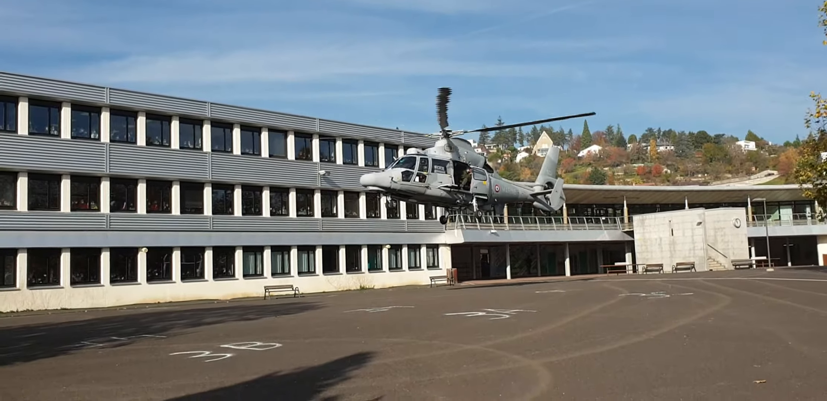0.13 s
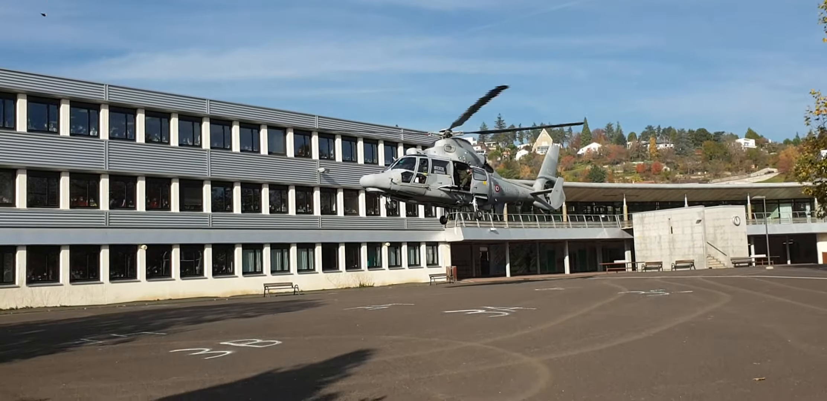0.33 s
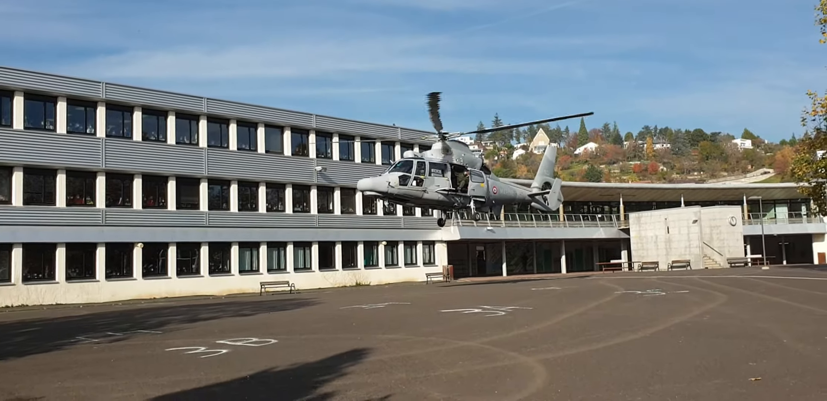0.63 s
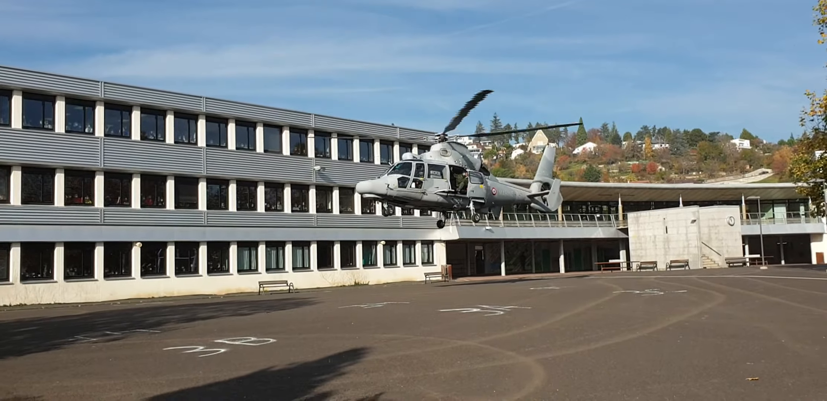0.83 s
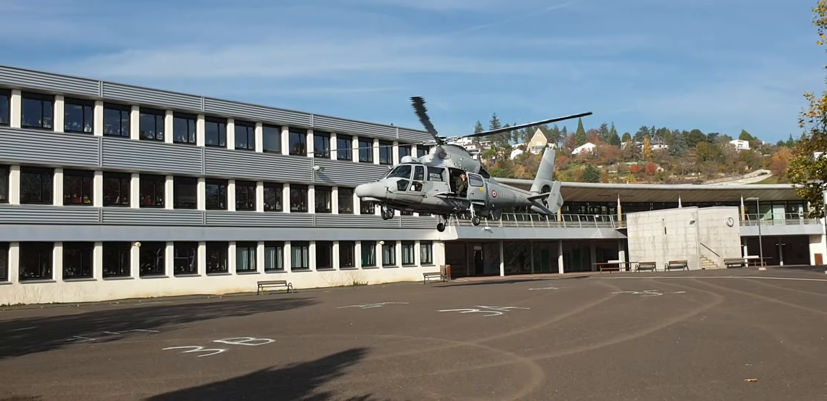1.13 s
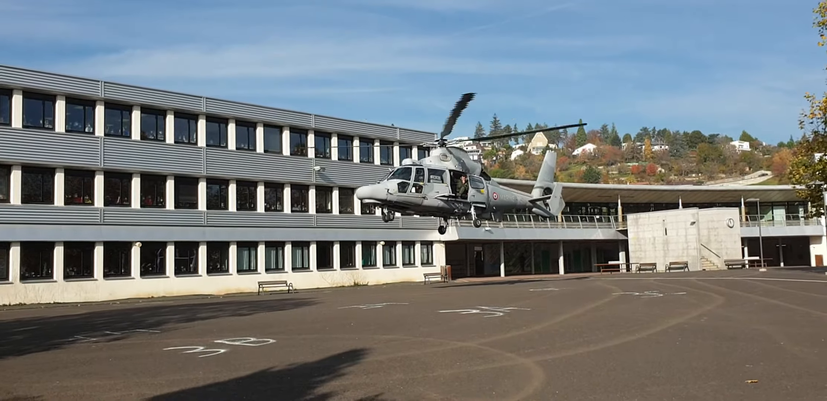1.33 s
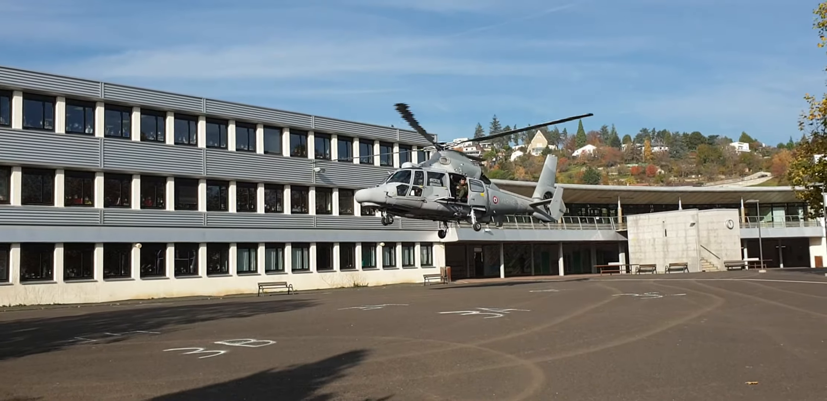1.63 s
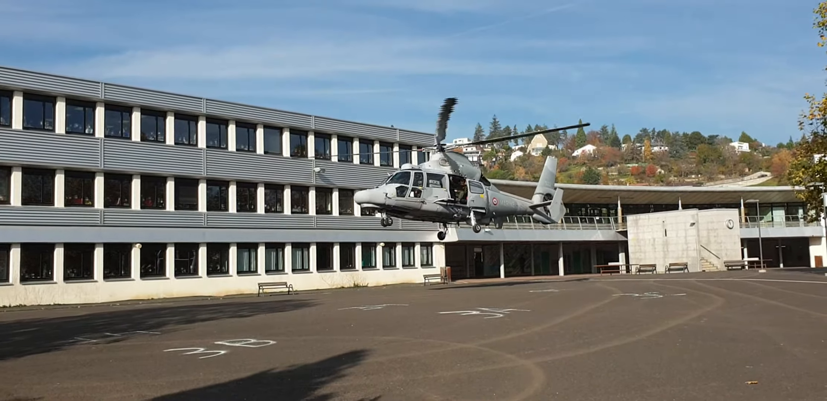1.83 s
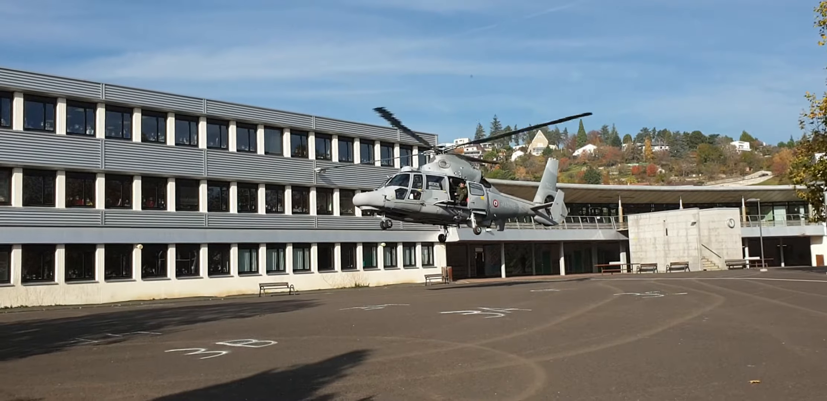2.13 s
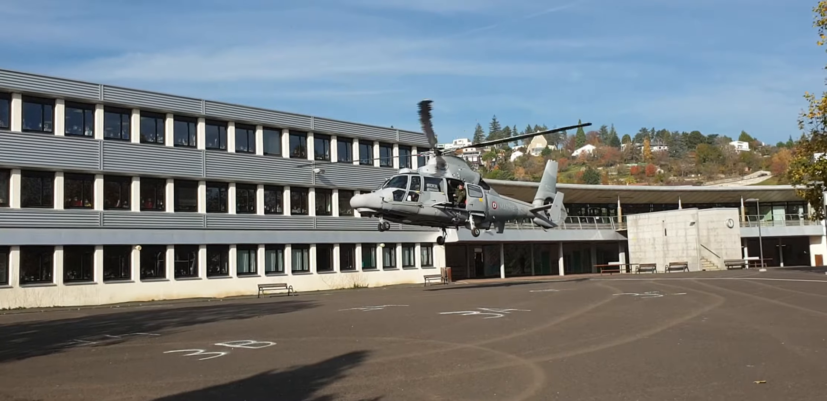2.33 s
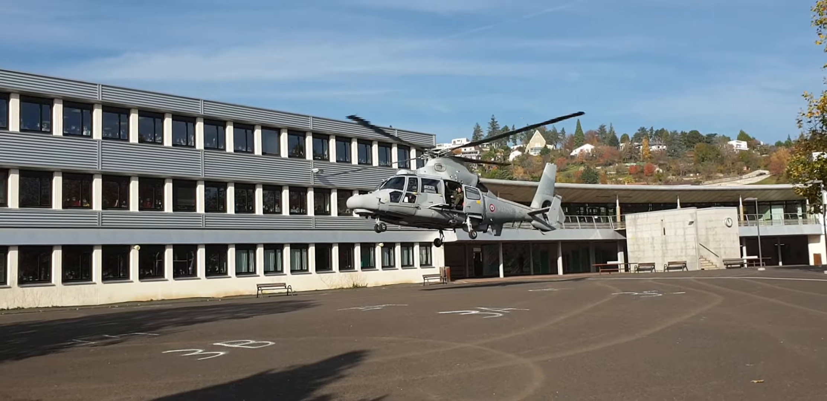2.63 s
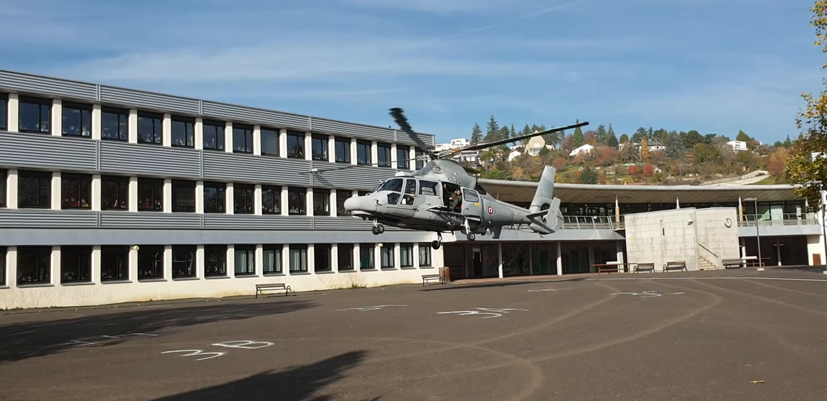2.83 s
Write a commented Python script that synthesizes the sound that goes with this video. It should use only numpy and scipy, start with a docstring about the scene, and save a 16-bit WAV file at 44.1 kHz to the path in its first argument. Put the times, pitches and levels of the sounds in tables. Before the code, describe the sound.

A helicopter hovers low, blades chopping over a roar as downwash buffets the microphone.

```python
"""A helicopter hovers low over a paved yard. From the start its four blades swish, thump and slap
over a broad turbulent roar, with a thin turbine whistle on top. About a second in, a strong gust
of downwash hits the two-port microphone, rumbling and crackling. By two seconds the gust has died
away; one band of the roar sings out briefly, and the blades chop on to the end."""
import sys
import numpy as np
from scipy import signal
from scipy.fft import rfft, irfft
from scipy.io import wavfile
from scipy.ndimage import uniform_filter1d

SR = 44100
rng = np.random.default_rng(int(sys.argv[2]) if len(sys.argv) > 2 else 0)


def dump(signal):
    """Clip the signal to [-1, 1] and save it as 16-bit WAV at the path in sys.argv[1]."""
    limited = np.clip(np.atleast_2d(signal).T, -1, 1)
    pcm = np.round(limited * 32767).astype(np.int16)
    wavfile.write(sys.argv[1], SR, pcm)


N = 130977
T = np.arange(N) / SR
BLADES_PER_S, FIRST_BLADE_S = 24.2, .034
PAN_LEFT = np.array([[.5], [-.5]])  # splits a dB difference between left and right

# The rotor's ride. Each row: time in seconds, roar, swish and knock levels in dB, blade lag in ms.
ROTOR_RIDE = [(0, -25, -25.5, -41.5, -2.5), (.3, -25, -34, -36, -2), (.6, -26, -30, -35.5, -2.5),
              (.9, -25.5, -29.5, -34.5, -1), (1.2, -24, -29.5, -36, 3), (1.5, -25, -25.5, -51, 2),
              (1.655, -30.5, -29, -35.5, 0), (1.672, -30.5, -21, -42, 2.2), (1.69, -25, -34, -33.5, 3),
              (1.8, -26, -25.5, -46, 1.2), (1.95, -26.5, -30, -40, -1.5), (2.08, -24, -25, -36.5, 0),
              (2.2, -27.5, -25.5, -40, 3.5), (2.4, -26.5, -27, -38, 3), (2.6, -26, -29.5, -45, 1.5),
              (2.8, -27.5, -28, -41.5, -0.04), (2.97, -24.5, -23.5, -38.5, -2)]
# The bands of the swish. Each row: centre in Hz, width in Hz, relative level in dB.
SWISH_BANDS = [(583, 115, -12), (1159, 140, -1), (1631, 167, -0.5), (2113, 106, -5), (3067, 150, -6.5),
               (3600, 200, -8), (4660, 1000, -9.5), (6700, 3100, -29.5)]
# Three throb resonances, then two for the knock. Each row: pitch in Hz, width in Hz, relative dB.
THUMP_MODES = [(60.7, 22, -3.5), (112, 85, -3), (218.6, 44, 0.5), (503, 48, -2), (571, 173, 6.5)]
# The hardest blade slaps. Each row: start in seconds, level in dB, ring pitch in Hz.
SLAP_HITS = [(0.0715, -15.5, 1650), (.186, -13, 1740), (0.2486, -9, 1160), (.3112, -18, 1700),
             (0.3529, -13, 1690), (0.392, -14, 1630), (.4055, -15.5, 1390), (.4339, -13, 1560),
             (0.556, -17, 1680), (0.5632, -10.5, 1630), (0.8076, -15, 1720), (0.848, -15, 1650),
             (1.6357, -12.5, 1700), (1.802, -15, 1410), (1.8874, -16, 1180), (2.0054, -15, 1220),
             (2.2643, -19, 1740), (2.3044, -16, 1200), (2.3456, -13.5, 1170), (2.3864, -18, 1770),
             (2.4645, -16, 1670), (2.5092, -19.5, 1140), (2.5518, -16, 1560), (2.881, -10, 1240)]
# Blows of air. Each row: centre in seconds, level in dB, pitch in Hz, right port's lag in cycles.
BUFFET_HITS = [(.255, -18.5, 99, 0.15), (1.082, -16, 77.4, -0.31), (1.1, -11.5, 81, -.03),
               (1.137, -21, 82, 0.32), (1.182, -21.5, 107, 0.47), (1.202, -13, 112, -0.23),
               (1.226, -18, 107, -0.043), (1.245, -13.5, 73, 0.05), (1.285, -19, 150, -0.14),
               (1.304, -15, 118, -0.2), (1.328, -13, 81, 0.33), (1.357, -18, 118, 0.28),
               (1.395, -11.5, 88, 0.42), (1.433, -17.5, 92, -.04), (1.504, -18, 80, 0.16),
               (1.538, -18.5, 68, 0.085), (1.562, -19, 66, -0.11), (1.622, -20, 115, 0.29),
               (1.732, -20.5, 90, 0.57), (1.759, -18.5, 112, -0.21)]
# Bright snaps. Each row: start in seconds, peak in dB before panning.
SNAP_HITS = [(1.048, -16), (1.1178, -9), (1.1416, -12), (1.1475, -9), (1.164, -13), (1.1855, -9),
             (1.1965, -13), (1.2054, -8.5), (1.3205, -6), (1.349, -11), (1.3883, -15), (1.3952, -17),
             (1.442, -7.5), (1.5953, -13.5), (1.6138, -8), (2.9219, -11)]
# The whistle's drift. Each row: time in seconds, pitch in Hz.
WHISTLE_PITCH = [(0, 10740), (.85, 10780), (1.5, 10740), (2.1, 10660), (2.7, 10580), (2.97, 10590)]

# Fader rides for these layers. Each row: time in seconds, level in dB.
THROB_RIDE = [(0, -42), (2.1, -46.5), (2.5, -44.5), (2.97, -37)]
RING_RIDE = [(0, -36.5), (1.95, -40), (2.07, -22.5), (2.14, -27.5), (2.2, -40), (2.97, -41)]
WIND_RIDE = [(0.0, -36), (0.95, -36.5), (1.37, -25), (1.8, -36), (1.96, -46)]
CRACKLE_RIDE = [(0, -35), (.9, -30), (1.04, -26), (1.09, -22), (1.145, -14.5), (1.17, -17.5), (1.2, -18.5),
                (1.24, -38), (1.29, -25), (1.325, -16.5), (1.337, -23), (1.348, -13.5), (1.37, -31),
                (1.395, -12), (1.415, -23.5), (1.45, -15.5), (1.475, -25), (1.58, -28.5), (1.61, -20.5),
                (1.655, -22), (1.672, -49), (1.72, -26.5), (2.97, -49)]
WHISTLE_RIDE = [(0, -35), (0.2, -37.5), (0.34, -28), (0.39, -37.5), (.81, -31.5), (1.0, -38), (1.12, -30.5),
                (1.49, -41.5), (1.85, -43), (1.9, -32), (1.94, -41), (2.04, -45), (2.075, -27), (2.11, -41),
                (2.52, -42), (2.65, -33), (2.75, -37.5), (2.97, -37.5)]

# EQ curves for the noisy layers. Each row: frequency in Hz, relative level in dB.
SLAP_EQ = [(500, -9), (1150, 3.5), (1600, -6), (2200, 2), (3600, -9), (6000, -20), (16000, -60)]
ROAR_EQ = [(18, -40), (30, -11), (59, -14.5), (147, -9.5), (206, -11), (334, -17.5), (415, -17.5),
           (527, -8), (814, -11.5), (1140, -4), (1380, -4), (1640, -2.5), (2130, -8), (2410, -11),
           (3620, -10), (4190, -14.5), (5200, -15.5), (7650, -31), (9500, -38.5), (12400, -70)]
WIND_EQ = [(18, -37), (30, -25), (55, 0), (105, -8.5), (200, -7), (400, -14.5), (1000, -26.5), (16000, -92)]
CRACKLE_EQ = [(200, -53), (500, -7), (1160, -1.5), (1720, 2), (2010, 0), (4080, -9.5), (6000, -30),
              (9000, -52)]
HISS_EQ = [(8000, -9), (9700, -4), (12000, 4), (16500, -5.5)]

# How alike the two ports sound. Each row: frequency in Hz, likeness from 0 to 1.
PORT_LIKENESS = [(60, 1), (400, 1), (700, 0.81), (1200, 0.47), (1700, 0.5), (2100, 0.64), (2400, 0.24),
                 (2900, 0.36), (4500, 0.29), (7000, 0.066), (9000, .03), (10600, 0.19), (12000, 0.1)]
# Phase of the noise they share. Each row: frequency in Hz, right port's lead in radians.
RIGHT_LEAD = [(1900, 0.079), (2900, 2.94), (7000, 5), (9500, 0.31)]


def amp(db):
    return 10 ** (np.asarray(db) / 20)


def unit_rms(x):
    return x / np.sqrt(np.mean(x ** 2) + 1e-20)


def ride(table, column=1):
    """One column of a timed table, drawn out over the whole scene."""
    rows = np.array(table)
    return np.interp(T, rows[:, 0], rows[:, column])


def at_hz(points, hz):
    """A curve read on a log-frequency axis, dropping by 40 below its first point."""
    freqs, values = np.transpose(points)
    return np.interp(np.log(hz + 1), np.log(freqs + 1), values, left=values[0] - 40)


def equalise(x, eq):
    """Shapes a sound with an EQ curve and sets it to unit level."""
    gain = amp(at_hz(eq, np.fft.rfftfreq(N, 1 / SR)))
    return unit_rms(irfft(rfft(x) * gain, N))


def port_noise(likeness=None):
    """White noise, partly alike at the two ports."""
    left, separate = rfft(rng.standard_normal((2, N)))
    hz = np.fft.rfftfreq(N, 1 / SR)
    if likeness is None:
        likeness = np.clip(at_hz(PORT_LIKENESS, hz + 60), -1, 1)
    lead = np.exp(1j * np.interp(hz, *np.transpose(RIGHT_LEAD)))
    right = likeness * lead * left + np.sqrt(1 - likeness ** 2) * separate
    return unit_rms(irfft(np.array([left, right]), N))


def wobble(span_s, channels=1):
    """Smooth random movement of unit size."""
    size = max(round(span_s * SR), 2)
    noise = rng.standard_normal((channels, N))
    return unit_rms(uniform_filter1d(uniform_filter1d(noise, size), size))


def resonate(x, hz, width_hz):
    """Two resonators in series, the second twice as wide, at unit level; the pitch may glide."""
    carrier = np.exp(2j * np.pi * np.cumsum(hz * np.ones(N)) / SR)
    for width in (width_hz, 2 * width_hz):
        pole = np.exp(-np.pi * width / SR)
        x = 2 * (carrier * signal.lfilter([1 - pole], [1, -pole], x / carrier)).real
    return unit_rms(x)


def blade_clicks(jitter_s, spread_db, early_s=0):
    """A padded track of one slightly uneven click a blade, and the slice the scene covers."""
    due = FIRST_BLADE_S + np.arange(-1, 75) / BLADES_PER_S
    timing, strength = rng.standard_normal((len(due), 2)).T
    rows = np.array(ROTOR_RIDE)
    lag_s = np.interp(due, rows[:, 0], rows[:, 4]) / 1000
    times = due + lag_s + jitter_s * timing - early_s
    pad, clicks = SR // 10, np.zeros(N + SR)
    np.add.at(clicks, np.round(times * SR).astype(int) + pad, amp(spread_db * strength))
    return clicks, slice(pad, pad + N)


def blade_swish():
    """Each blade opens a soft, grainy burst of air that rings in wandering bands."""
    width_s, wander, grain_db = .0057, .046, 1.5
    t = np.arange(-1500, 1501) / SR
    swell = np.exp(-.5 * (t / width_s) ** 2)
    out = np.zeros((2, N))
    for hz, width_hz, db in SWISH_BANDS:
        clicks, heard = blade_clicks(jitter_s=.0015, spread_db=1.4, early_s=.0035)
        gate = signal.oaconvolve(clicks, swell, "same")[heard]
        centre_hz = hz * (1 + wander * wobble(.021)[0])
        air = gate * amp(grain_db * wobble(.0018)) * port_noise()
        out += amp(db) * resonate(air, centre_hz, width_hz)
    return amp(ride(ROTOR_RIDE, 2)) * unit_rms(out)


def blade_thump():
    """Each blade's pressure pulse rings a steady low throb and a knock that comes and goes."""
    clicks, heard = blade_clicks(jitter_s=.0001, spread_db=1)
    rings = [amp(db) * resonate(clicks[heard], hz, width_hz) for hz, width_hz, db in THUMP_MODES]
    throb = amp(ride(THROB_RIDE)) * unit_rms(sum(rings[:3]))
    knock = amp(ride(ROTOR_RIDE, 3)) * unit_rms(sum(rings[3:]))
    return throb + knock


def blade_slaps():
    """Some blades crack harder than the rest: a short ring in a puff of air."""
    rise_s, fall_s, air_db = .00081, .0032, -9
    gate, rings, t = np.zeros(N), np.zeros(N), np.arange(1500) / SR
    envelope = np.minimum(t / rise_s, 1) * np.exp(-np.maximum(t - rise_s, 0) / fall_s)
    for start_s, db, hz in SLAP_HITS:
        at = round(start_s * SR)
        gate[at:at + len(t)] += amp(db + air_db) * envelope
        rings[at:at + len(t)] += amp(db) * envelope * np.sin(2 * np.pi * (hz * t + rng.random()))
    return rings + gate * equalise(port_noise(), SLAP_EQ)


def roar():
    """The bed: broad turbulence of rotor and exhaust, with a thin hiss on top."""
    body = amp(ride(ROTOR_RIDE, 1) + 1.43 * wobble(.027)) * equalise(port_noise(), ROAR_EQ)
    hiss = amp(-45 + 2 * wobble(.03, channels=2)) * equalise(port_noise(), HISS_EQ)
    return body + hiss


def roar_ring():
    """One narrow band of the roar sings out, most clearly just after two seconds."""
    return amp(ride(RING_RIDE)) * resonate(port_noise(), hz=1590, width_hz=130)


def wind_rumble():
    """Downwash rumbles in lumps, mostly separate at each port, and dies down after the gust."""
    left_db, sway_db, lumps_db = .5, 7, 5.5
    pan_db = (left_db + sway_db * wobble(.05)) * PAN_LEFT
    lumps = port_noise(likeness=-.18) * amp(lumps_db * wobble(.0085, channels=2))
    return amp(ride(WIND_RIDE) + pan_db) * equalise(lumps, WIND_EQ)


def wind_buffets():
    """The hardest blows of air: a swing or two of pressure, out of step at the two ports."""
    width_cycles = .37
    out, t = np.zeros((2, N)), np.arange(-2000, 2000) / SR
    for centre_s, db, hz, right_lag in BUFFET_HITS:
        cycles = hz * t + rng.random() - np.array([[0], [right_lag]])
        envelope = np.exp(-.5 * (t * hz / width_cycles) ** 2)
        at = round(centre_s * SR)
        out[:, at - 2000:at + 2000] += amp(db) * envelope * np.cos(2 * np.pi * cycles)
    return out


def wind_crackle():
    """Dense sharp ticks at each port, loudest while the gust blows."""
    ticks_per_s, spread_db = 900, 4.5
    trigger, polarity, size = rng.random((3, 2, N))
    ticks = (trigger < ticks_per_s / SR) * np.sign(polarity - .5)
    ticks *= amp(-spread_db * np.log(size + .029))  # many small, a few big
    flutter = amp(3.03 * wobble(.0054, channels=2))
    return amp(ride(CRACKLE_RIDE)) * equalise(ticks * flutter, CRACKLE_EQ)


def wind_snaps():
    """A few loud, bright snaps jump out of the crackle, leaning right."""
    rise_s, fall_s, band_hz, left_db = .0002, .001, (1000, 5200), -6.5
    out, t = np.zeros((2, N)), np.arange(400) / SR
    envelope = np.minimum(t / rise_s, 1) * np.exp(-t / fall_s)
    bandpass = signal.butter(4, band_hz, "band", fs=SR)
    for start_s, db in SNAP_HITS:
        noise = rng.standard_normal(len(t)) + 1.26 * rng.standard_normal((2, len(t)))  # mono plus wide
        burst = signal.lfilter(*bandpass, noise * envelope)
        at = round(start_s * SR)
        out[:, at:at + len(t)] += amp(db + left_db * PAN_LEFT) * burst / abs(burst).max()
    return out


def turbine_whistle():
    """The compressor's whistle, blurred by turbulent air; its wide skirt is steadier than its core."""
    flicker_db, skirt_db, skirt_follows = 3, 1, .35
    hz, level_db = ride(WHISTLE_PITCH), ride(WHISTLE_RIDE)
    core = resonate(port_noise(), hz, width_hz=110)
    skirt = resonate(port_noise(), hz, width_hz=475)
    swing_db = level_db - level_db.mean() + flicker_db * wobble(.016)
    return amp(level_db.mean()) * (core * amp(swing_db) + skirt * amp(skirt_db + skirt_follows * swing_db))


def scene():
    """The helicopter and its downwash, mixed at the two ports."""
    helicopter = roar() + roar_ring() + blade_swish() + blade_slaps() + blade_thump() + turbine_whistle()
    return helicopter + wind_rumble() + wind_buffets() + wind_crackle() + wind_snaps()


def record(dry):
    """A slight lean to the right, soft overload on the peaks, and the very top rolled off."""
    left_db, ceiling, cutoff_hz = -.6, .95, 15950
    drive = dry * amp(left_db * PAN_LEFT) / ceiling
    limited = ceiling * drive / (1 + drive ** 8) ** (1 / 8)
    lowpass = signal.firwin(1023, cutoff_hz, window=("kaiser", 11), fs=SR)
    return signal.oaconvolve(limited, lowpass[None], "same")


dry = scene()
out = record(dry)
dump(out)
```